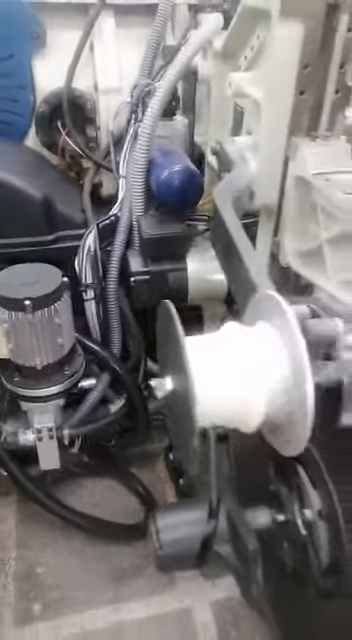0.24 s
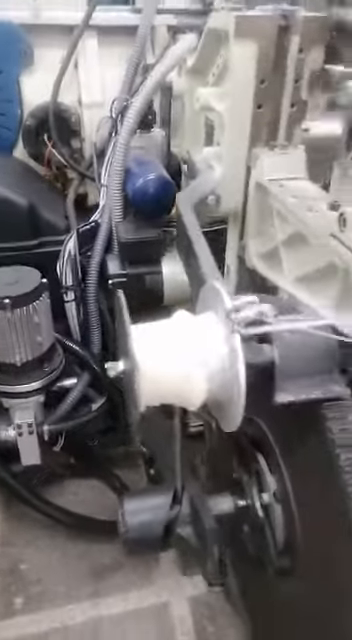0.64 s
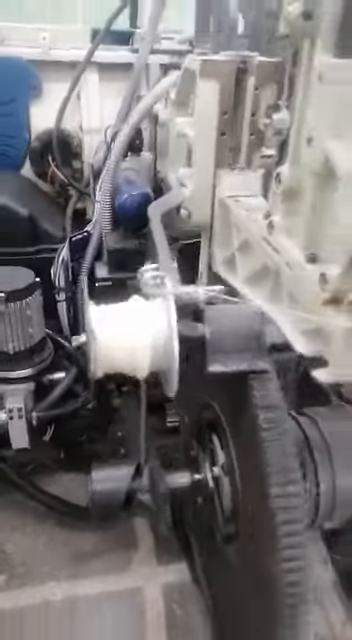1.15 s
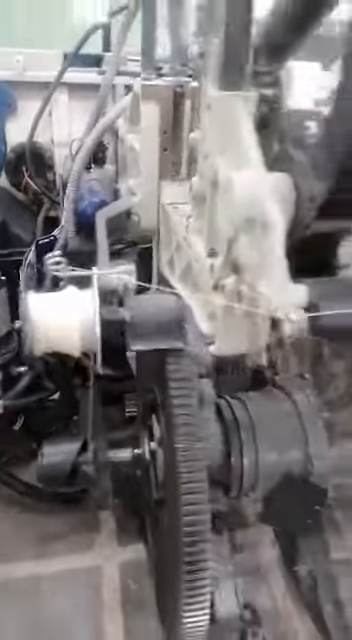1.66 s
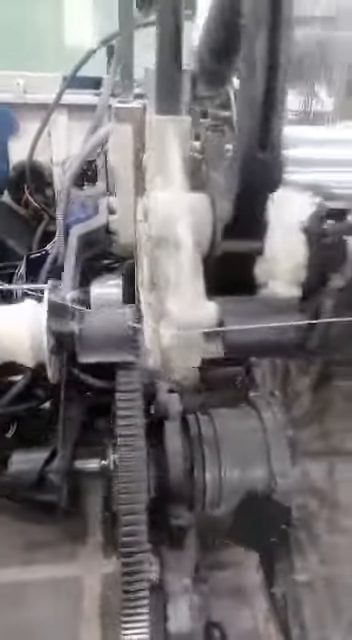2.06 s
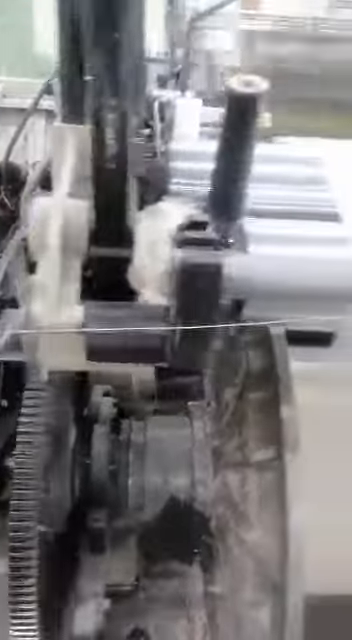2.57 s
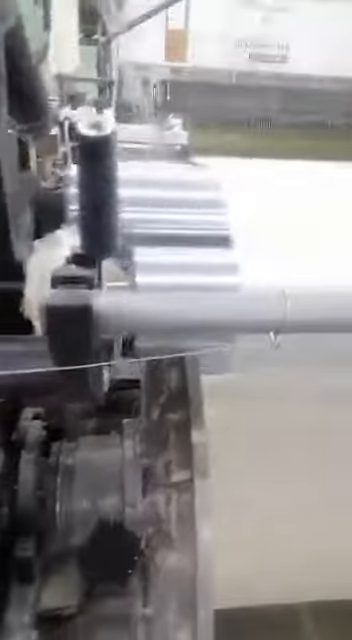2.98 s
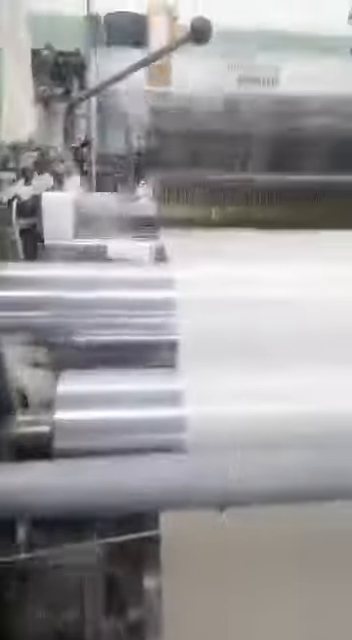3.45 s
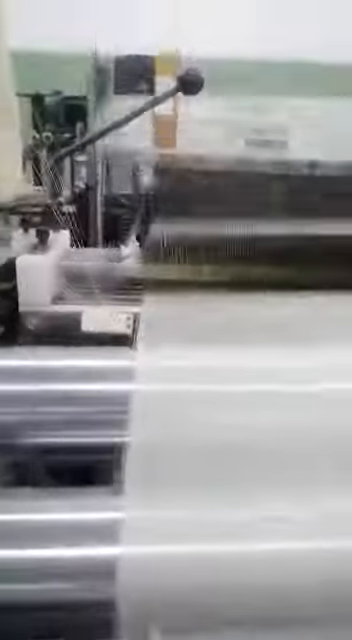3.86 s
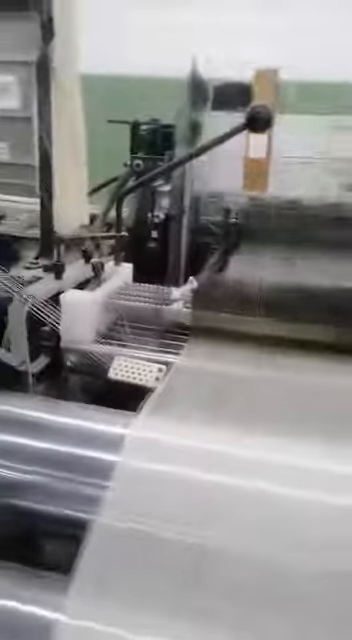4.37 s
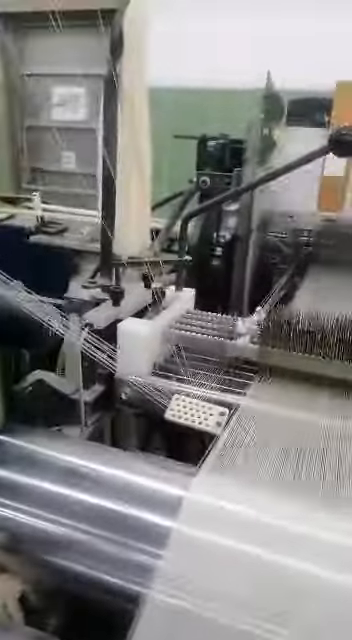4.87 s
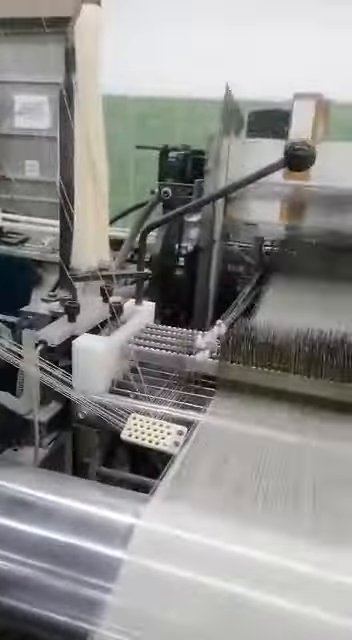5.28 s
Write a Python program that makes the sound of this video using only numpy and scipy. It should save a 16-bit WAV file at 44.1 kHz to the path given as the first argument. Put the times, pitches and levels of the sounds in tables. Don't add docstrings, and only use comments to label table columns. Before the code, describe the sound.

A continuous wall of loom noise fills a factory hall from start to end: throbbing low hum, blurred ringing clatter and broad metallic hiss pulsing nearly four times a second. Small lulls and surges pass through it. The stereo phone moves along the nearest machine, bass centred with a slight left lean, treble wide, and the reed hiss growing a little.

```python
import sys
import numpy as np
from scipy import signal
from scipy.fft import rfft, irfft
from scipy.io import wavfile
from scipy.ndimage import uniform_filter1d

SR = 44100
rng = np.random.default_rng(int(sys.argv[2]) if len(sys.argv) > 2 else 0)


def store_pcm(level_fs):
    pcm = np.round(np.clip(level_fs, -1, 1) * 32767).astype(np.int16)
    wavfile.write(sys.argv[1], SR, np.atleast_2d(pcm).T)


def decibels_to_gain(level_db):
    exponent = np.asarray(level_db, float) / 20
    return 10 ** exponent


N = 243873
CYCLE_HZ = 3.7502
ROAR_DB, HISS_DB = -25, -24.5
LEAN_DB = 2.5
DRIVE_RING_HZ, CLOTH_RING_HZ, RING_WIDTH_HZ = 180, 270, 140
RUSH_PART = 0.12
EDGE_HZ, EDGE_DB = 15170, -5
LOW_CLATTER, FRAME_RING, METAL_RATTLE, REED_HISS = range(4)

# multiple of the pick rate, then level in dB rms at the drive end,
# halfway and at the cloth end.
FRAME_HUM = [(2, -69, -67, -65), (3, -52, -52, -52), (4, -63, -65, -61), (5, -54, -53, -55),
             (6, -56, -56, -55), (7, -56, -55, -52), (8, -44, -44, -44), (9, -52, -49, -53),
             (11, -49, -58, -72), (12, -49, -53, -57), (13, -53, -52, -52), (14, -42, -45, -52),
             (15, -52, -55, -51), (16, -41, -47, -46), (17, -44, -47, -60), (18, -53, -57, -48),
             (19, -47, -48, -43), (20, -57, -43, -43), (21, -50, -58, -65), (22, -49, -42, -48),
             (23, -43, -43, -47), (24, -38, -41, -46), (25, -55, -58, -44), (26, -30, -39, -43),
             (27, -42, -45, -54), (28, -47, -41, -43), (29, -47, -49, -45), (30, -46, -42, -51),
             (31, -48, -38, -43), (32, -44, -44, -38)]
# time in seconds at the drive end, halfway and at the cloth end.
WALK_TIMES = (.55, 2.76, 5.2)
# frequency in Hz, level in dB per Hz.
ROAR_COLOUR = [(12, -48), (20, -18), (54, -8), (81, -11), (107, -6), (151, -4.5), (189, 7), (270, -8.5),
               (300, -7), (615, -11), (852, -8), (1200, -16.5), (1560, -35), (2640, -120)]
# frequency in Hz, left level and right level in dB per Hz.
HISS_COLOUR = [(650, -30, -32), (1100, -1.7, -3.8), (1250, 0.3, -1.8), (1450, -2.1, -3.7),
               (2000, -2.9, -5.9), (2800, -6.1, -9.9), (4000, -7.0, -10.0), (6000, -8.4, -9.7),
               (8500, 1.4, -5.1), (10400, -7.5, -9.2), (12500, -11.4, -13.1), (15000, -16.8, -17.4)]
# frequency in Hz, share of power that repeats each cycle (0-1),
# part of that share that tells the two picks apart (0-1).
REPEATING = [(30, .85, .06), (60, .88, .04), (140, .87, .05), (200, .97, .03), (250, .87, .08),
             (330, .63, .22), (500, .51, .17), (850, .42, .25), (1250, .15, .35), (1700, .01, .3)]
# frequency in Hz, left-right likeness (-1 to 1).
LIKENESS = [(60, 0.98), (110, 0.91), (200, 0.96), (380, 0.73), (700, 0.4), (1290, -0.19), (2380, 0.052),
            (4400, 0.0034), (8120, -0.056), (15000, 0.059)]
PICK_BLOWS = [
    (.078, -.3),
    (.377, 1),
    (.702, .88),
]
# frequency in Hz, width in Hz,
# left level and right level in dB.
CASE_PEAKS = [(1650, 230, 1.8, 2.7), (2500, 420, 4.7, 4.5), (3360, 250, -0.2, 0.8), (3710, 320, -5.0, -3.6),
              (4250, 530, -1.0, 3.9), (4660, 440, 0.6, -1.0), (5220, 480, 1.3, 2.8), (7010, 690, 0.6, 2.8),
              (7600, 520, -3.8, -0.1), (8100, 510, -1.8, 1.2), (8580, 630, -2.0, -0.4),
              (9300, 400, -1.2, -1.7), (9850, 510, 1.5, 2.0), (10900, 490, -2.6, -1.5),
              (11480, 500, 0.6, 0.1), (13980, 620, 0.1, 0.4), (14810, 630, 4.1, 1.8)]
# frequency in Hz, width in Hz, left level and right level in dB.
FRAME_RINGS = [(670, 87, 0, -2), (807, 58, 0.8, 1.1), (1250, 300, -1.45, -0.7), (2370, 540, 1.44, 0.8),
               (3600, 360, 0.3, -2)]
# level in dB at the drive end, halfway and at the cloth end.
DRIVE_RUMBLE_DB = (1.5, 0, -2.5)
RING_SHIFT_DB = (0.5, 0.5, 2.5)
# time in seconds, level in dB, length in seconds.
HALL_SURGES = [
    (.17, -1.8, .08),
    (.52, .7, .3),
    (1.34, -1.6, 0.11),
    (2.05, -0.7, 0.2),
    (2.5, 0.5, .25),
    (3.02, 1.2, 0.083),
    (3.198, -1.5, 0.091),
    (4.294, .8, .15),
    (4.625, -.7, .2),
    (4.91, 1.2, 0.16),
]
SURGE_FOLLOW = (0.71, 1.2, 0.56, 0.74)
NEARING = (0.087, .05, .02, 0.1)
# place within the cycle (0-1), level in dB.
YARN_RUSHES = [
    (.01, .5),
    (.24, 1.5),
    (.47, 0.5),
]


def evened(x):
    return x / np.sqrt(np.mean(x ** 2) + 1e-20)


def read(points, hz, column=1):
    table = np.transpose(points)
    return np.interp(np.log(hz + 1), np.log(table[0] + 1), table[column])


def bump(away, length):
    return np.exp(-(2 * away / length) ** 2)


def swing(t, layer):
    surges = sum(db * bump(t - start, length) for start, db, length in HALL_SURGES)
    level = SURGE_FOLLOW[layer] * surges + NEARING[layer] * t
    return level - level.mean()


def two_sided_noise(hz, magnitude):
    a, b, c, d = rng.standard_normal((len(hz), 4)).T
    same = np.clip(read(LIKENESS, hz), -1, 1)
    left = a + 1j * b
    right = same * left + np.sqrt(1 - same ** 2) * (c + 1j * d)
    spectrum = np.array([left, right]) * magnitude / np.sqrt(1 + same)
    return irfft(spectrum, 2 * len(hz) - 2)[:, :N]


def shaped(x, field):
    hz, t, z = signal.stft(x, SR, nperseg=512, noverlap=384)
    z = z * decibels_to_gain(field(hz[:, None], t))
    return signal.istft(z, SR, nperseg=512, noverlap=384)[1][:, :N]


def hum(wander=1.1, scatter=2.4, apart_db=-22):
    t = np.arange(N) / SR
    out = np.zeros((2, N))
    part, strength = np.transpose(PICK_BLOWS)
    highest = FRAME_HUM[-1][0]
    for k, *level_db in FRAME_HUM:
        drift, skew, late = rng.uniform(-0.84, 1, 3)
        start = np.angle(np.sum(strength * np.exp(-2j * np.pi * k * part)))
        start += scatter * np.pi * late * max(0, .75 - k / highest)
        walked = wander * drift * k / highest * (t - WALK_TIMES[0]) / WALK_TIMES[1]
        phase = 4 * np.pi * CYCLE_HZ * k * t + start + walked
        size = np.sqrt(2) * decibels_to_gain(np.interp(t, WALK_TIMES, level_db))
        middle = np.cos(phase)
        side = decibels_to_gain(apart_db) * np.cos(phase + np.pi * skew)
        out += size * np.array([middle + side, middle - side])
    return out


def roar(blur=.00042, blur_hz=.05, hum_top_hz=243):
    hz = np.fft.rfftfreq(2 ** 18, 1 / SR)
    order = np.round(hz / CYCLE_HZ)
    width = np.minimum(blur * hz + blur_hz, CYCLE_HZ / 3)
    bell = np.exp(-.5 * ((hz - order * CYCLE_HZ) / width) ** 2)
    comb = CYCLE_HZ / width / np.sqrt(2 * np.pi) * bell
    share = np.clip(read(REPEATING, hz, column=1), 0, 1)
    odd = np.clip(read(REPEATING, hz, column=2), 0, 1)
    weight = 2 * np.where(order % 2 == 1, odd, (1 - odd) * (hz > hum_top_hz))
    x = two_sided_noise(hz, decibels_to_gain(read(ROAR_COLOUR, hz)) * np.sqrt(1 - share + share * weight * comb))

    def field(hz, t):
        ring = np.clip((hz - 550) / 200, 0, 1)
        rumble = (hz < hum_top_hz) * np.interp(t, WALK_TIMES, DRIVE_RUMBLE_DB)
        tilt = bump(hz - CLOTH_RING_HZ, RING_WIDTH_HZ) - bump(hz - DRIVE_RING_HZ, RING_WIDTH_HZ)
        shift = np.interp(t, WALK_TIMES, RING_SHIFT_DB) * tilt
        low = (1 - ring) * (hz > hum_top_hz) * swing(t, LOW_CLATTER)
        return rumble + shift + low + ring * swing(t, FRAME_RING)
    return decibels_to_gain(ROAR_DB) * shaped(evened(x), field)


def hiss(stroke=0.87, flicker_db=0.36, patchy_db=0.36):
    hz = np.fft.rfftfreq(2 ** 18, 1 / SR)
    left_db, right_db = read(HISS_COLOUR, hz, column=1), read(HISS_COLOUR, hz, column=2)
    x = two_sided_noise(hz, decibels_to_gain([left_db, right_db]))

    def field(hz, t):
        high = np.clip((hz - 2800) / 1400, 0, 1)
        beat = 0
        for part, db in YARN_RUSHES:
            away = (t * CYCLE_HZ - part + .5) % 1 - .5
            beat = beat + stroke * db * bump(away, RUSH_PART)
        flicker = flicker_db * evened(uniform_filter1d(rng.standard_normal(len(t)), size=8))
        patches = uniform_filter1d(rng.standard_normal((len(t), len(hz))), size=24, axis=0)
        patches = patchy_db * evened(uniform_filter1d(patches, size=14, axis=1)).T
        slow = high * swing(t, REED_HISS) + (1 - high) * swing(t, METAL_RATTLE)
        return slow + high * (beat + flicker) + patches
    return decibels_to_gain(HISS_DB) * shaped(evened(x), field)


def scene():
    lean = decibels_to_gain(np.array([[.5], [-.5]]) * LEAN_DB)
    return (hum() + roar()) * lean + hiss()


def roll_off(x):
    return signal.sosfilt(signal.butter(12, 15750, fs=SR, output="sos"), x)


def record(dry):
    hz = np.fft.rfftfreq(N, 1 / SR)
    colour_db = EDGE_DB * (hz > EDGE_HZ)
    for centre, width, left, right in FRAME_RINGS + CASE_PEAKS:
        bell = np.exp(-(2 * (hz - centre) / width) ** 2 / 2)
        colour_db = colour_db + np.array([[left], [right]]) * bell
    mix = irfft(rfft(dry) * decibels_to_gain(colour_db), N)
    return roll_off(mix)


dry = scene()
out = record(dry)
store_pcm(out)
```